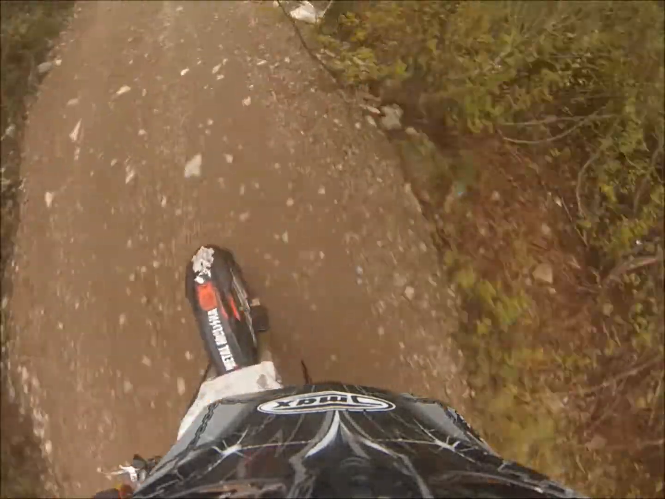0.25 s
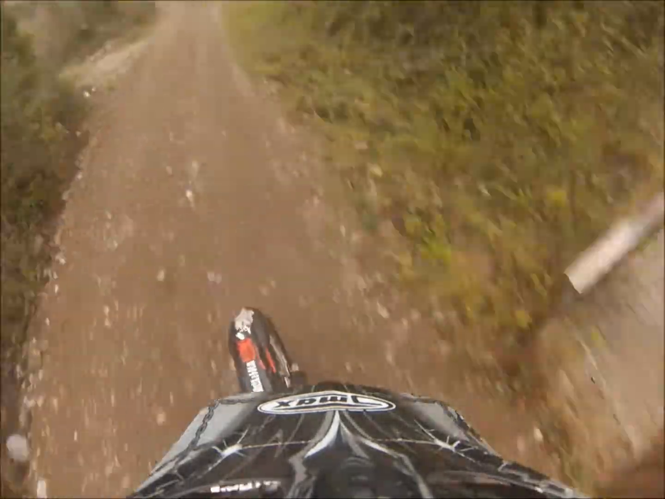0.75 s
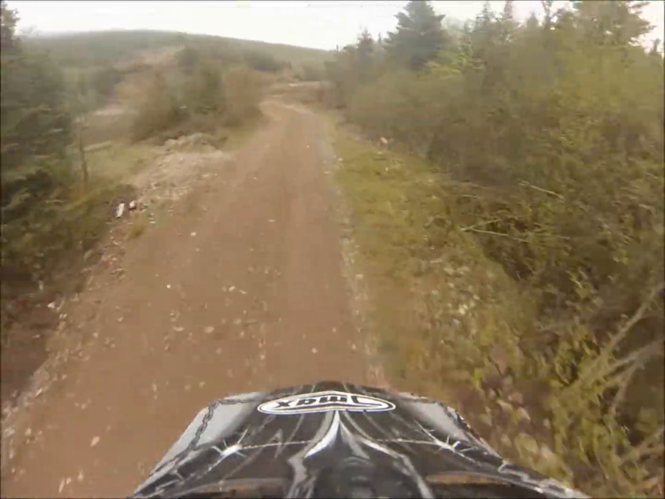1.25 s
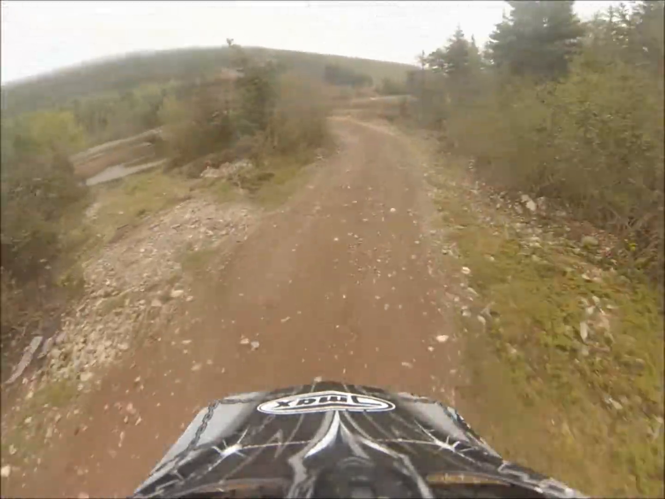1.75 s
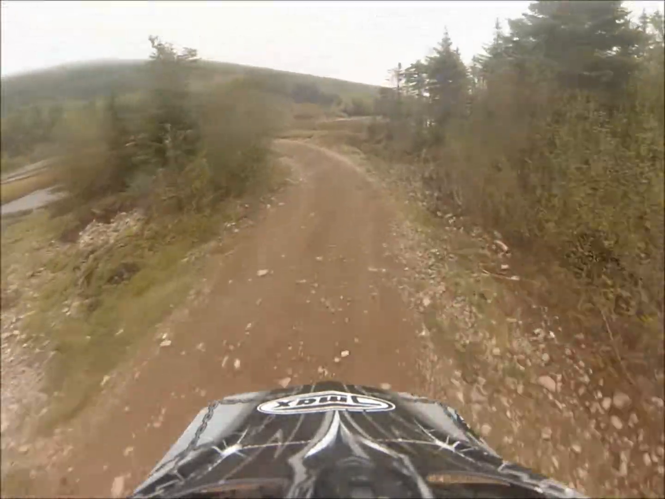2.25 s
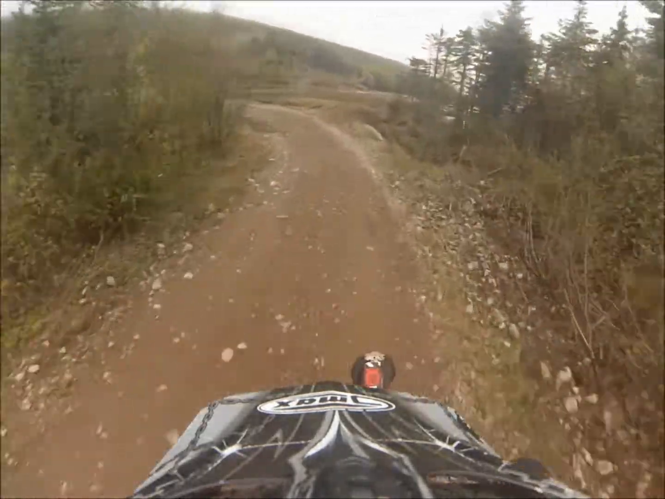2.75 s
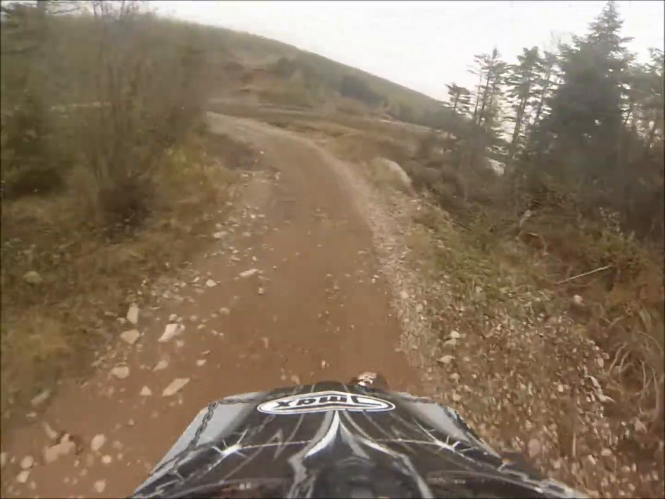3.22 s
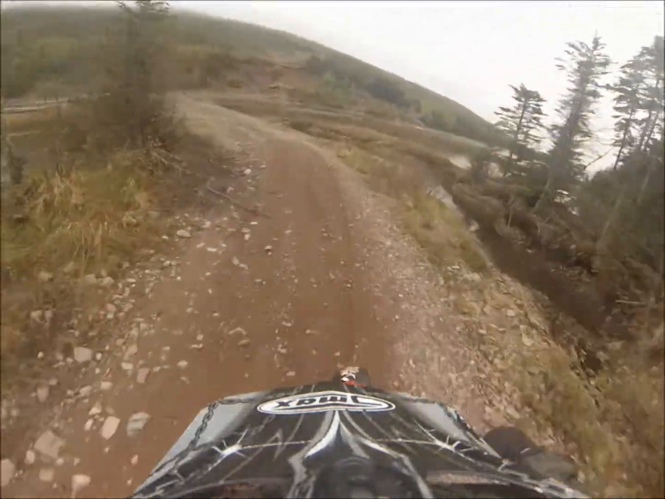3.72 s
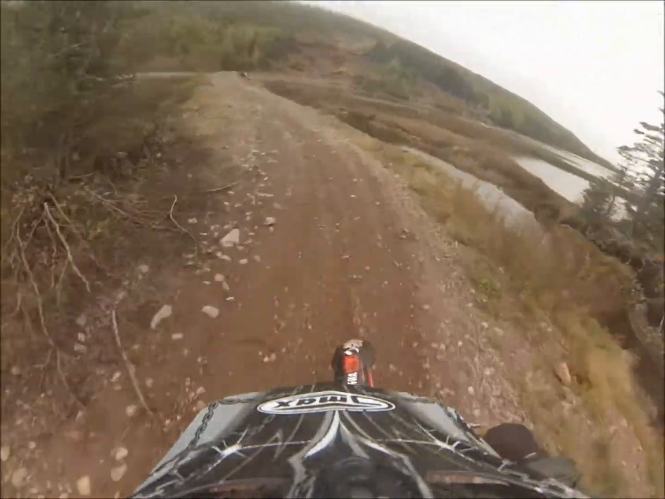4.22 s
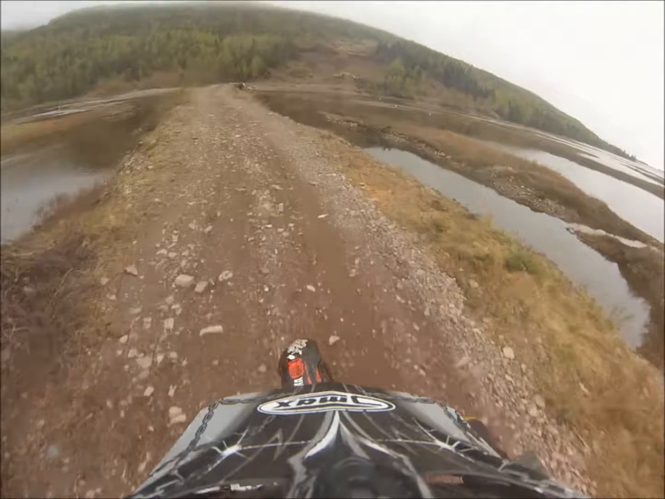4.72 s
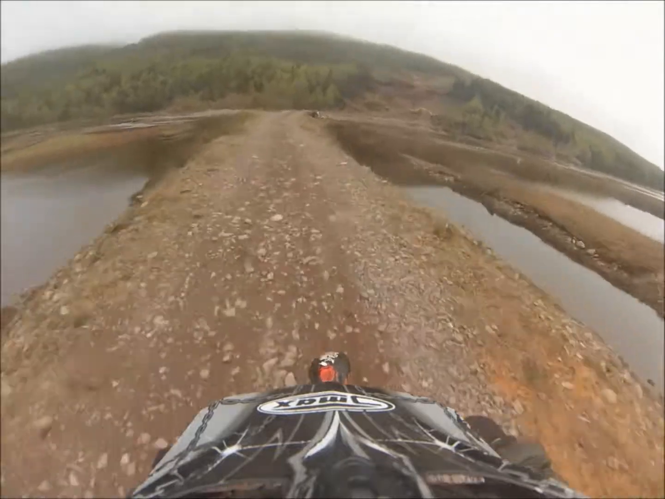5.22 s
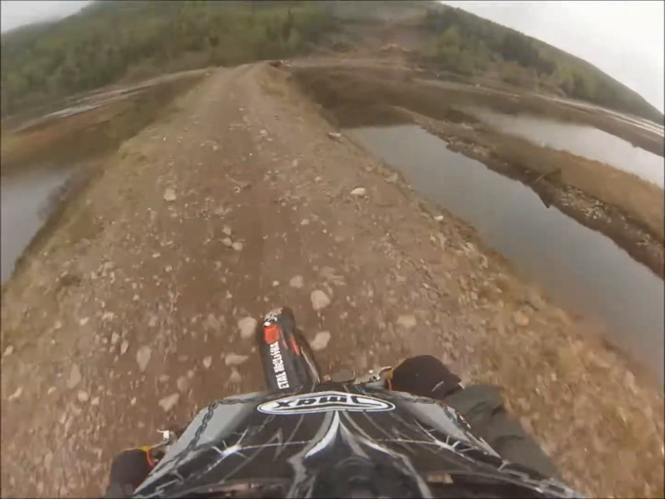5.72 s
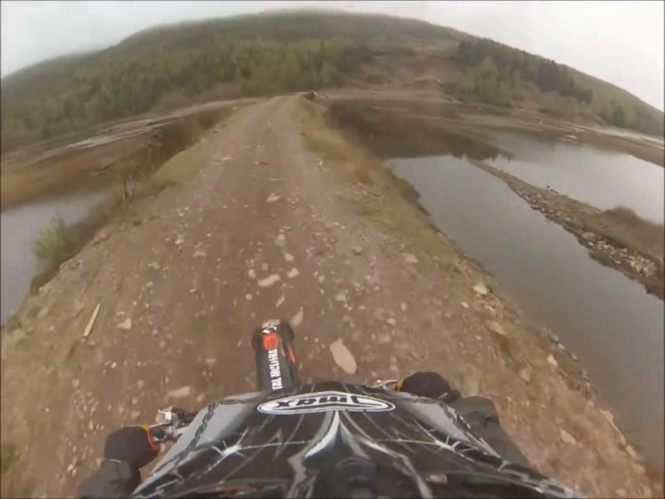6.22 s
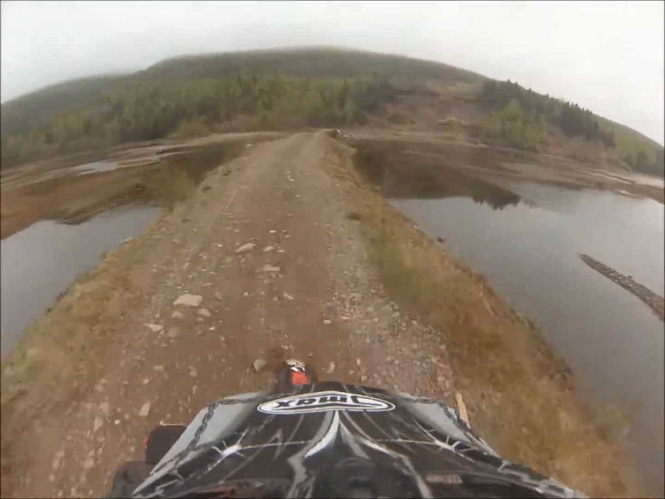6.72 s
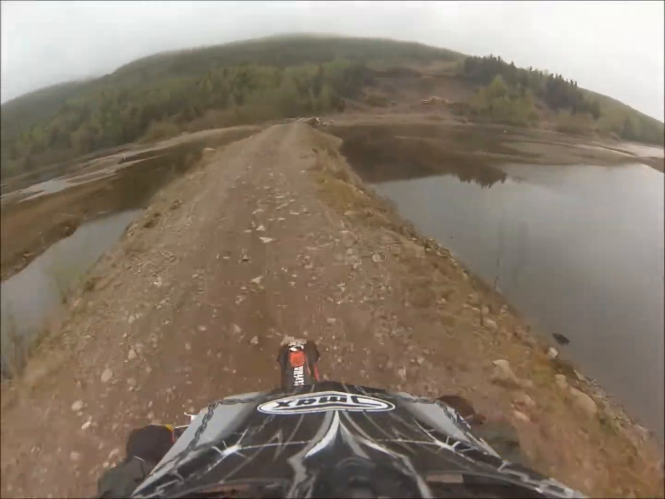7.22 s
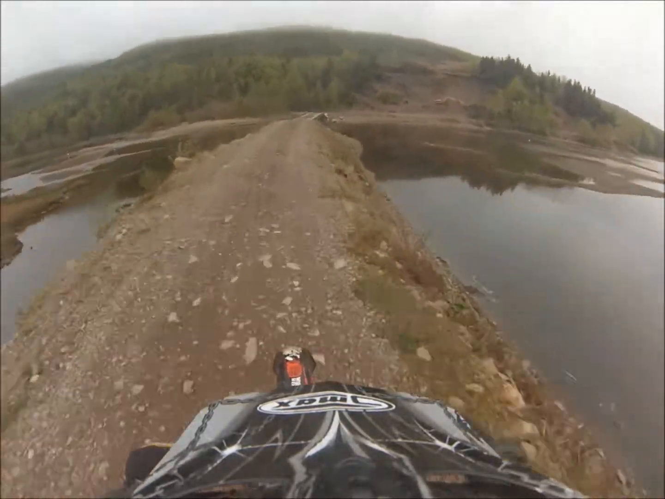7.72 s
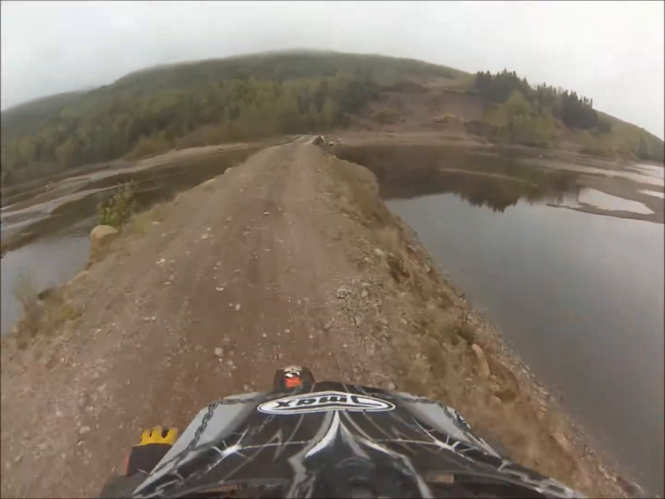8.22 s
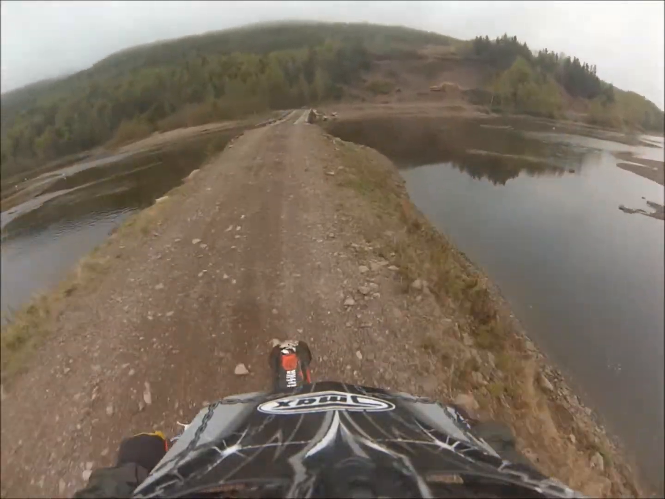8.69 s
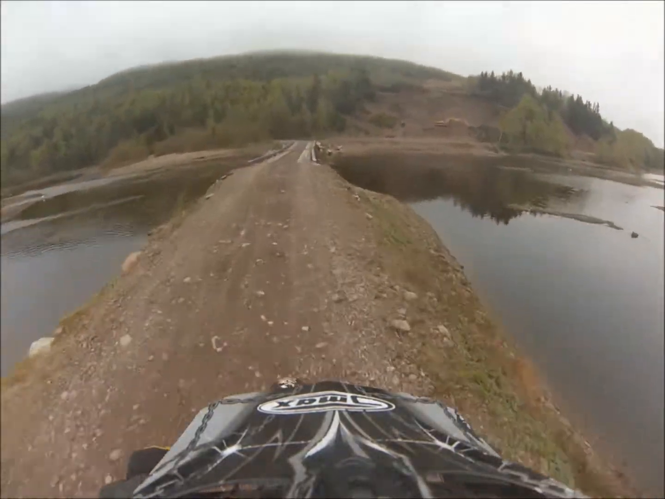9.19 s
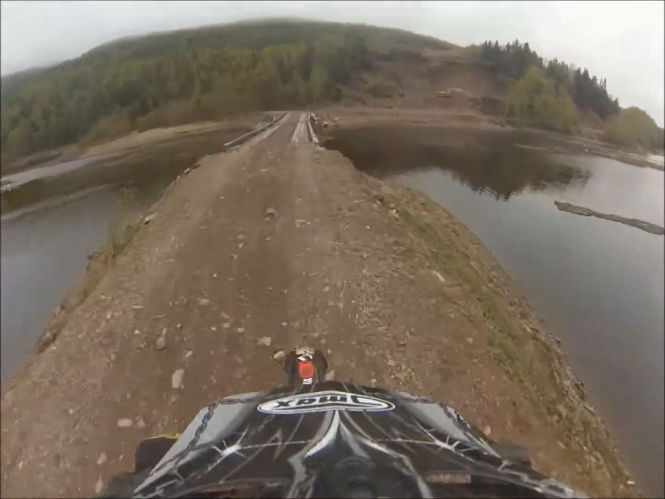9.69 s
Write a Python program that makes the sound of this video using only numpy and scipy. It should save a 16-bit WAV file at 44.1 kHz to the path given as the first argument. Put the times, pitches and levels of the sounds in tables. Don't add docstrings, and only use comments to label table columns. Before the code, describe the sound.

Outdoor gravel track, close enclosed microphone on a moving helmet. A four-stroke motorcycle engine burbles quietly and gradually slows, then revs up sharply once and falls back. Two big thumps follow, dipping the level for an instant. Steady puttering returns with thin gear whine, gusty low boom, dull knocks, scuffs and tiny ticks; near the end the revs hop up twice as the bike slows further.

```python
import sys
import numpy as np
from scipy import signal
from scipy.fft import rfft, irfft, next_fast_len
from scipy.io import wavfile
from scipy.ndimage import uniform_filter1d, map_coordinates

SR = 44100
rng = np.random.default_rng(int(sys.argv[2]) if len(sys.argv) > 2 else 0)


def linear_from_db(decibels):
    return 10 ** (np.asarray(decibels, float) / 20)


def store_pcm(level_fs):
    pcm = np.round(np.clip(level_fs, -1, 1) * 32767).astype(np.int16)
    wavfile.write(sys.argv[1], SR, np.atleast_2d(pcm).T)


N = 438794

# time in seconds, loudness in dB, air and tyre rush over it in dB.
ENGINE_LEVEL = [(0, -46, -0.5), (.4, -45, 2), (1.3, -44.5, 0), (1.6, -45, 4.5), (2.35, -47.5, 1),
                (3.5, -47.5, 0.5), (4.24, -46.5, -3), (4.46, -41.5, 3.5), (4.62, -32, -1),
                (4.87, -31, -1.5), (5.13, -42, 2), (5.5, -41.5, 2), (6.6, -45.5, 0.5), (7, -43.5, 3.5),
                (8.15, -44, 3.5), (8.55, -46, 1.5), (9.25, -46, 1), (9.95, -53.5, -1.5)]
# start in seconds, extra firings in 1/s.
DOWNSHIFTS = [
    (8.54, 14),
    (8.95, 13.5),
]
CLUTCH_S = 0.14
# frequency in Hz, width in Hz, level in dB.
CASE_MODES = [(1075, 206, -8), (1287, 250, -6), (1553, 143, -2.5), (2046, 146, -9), (2510, 150, -11.5)]
# frequency in Hz, width in Hz, level in dB.
SHELL_MODES = [(3625, 970, 6), (5300, 1970, 0), (6610, 960, -2), (12000, 1100, -24.5)]


def engine():
    # time in seconds, firings in 1/s.
    crank_speed = [(0, 32), (.3, 32.7), (.55, 31.2), (1.5, 31.7), (1.75, 30.2), (2.6, 29.2), (3.4, 26),
                   (4.18, 26.1), (4.52, 29.8), (4.65, 38.1), (4.76, 43.7), (4.88, 46.4), (5.13, 39.2),
                   (5.3, 35), (7.3, 34), (8.06, 32.9), (8.53, 28), (9.95, 24)]
    # time in seconds, load 0-1, clean share of the exhaust 0-1, firing bark in the clatter 0-1.
    throttle = [(0, .2, .35, .12), (.5, .15, .82, .08), (1.5, .13, .82, .08), (1.65, 0, .3, .06),
                (2.4, .1, .65, .08), (3.3, 0, .35, .08), (3.8, .17, .8, .12), (4.42, .2, .92, .22),
                (4.58, 1, .94, .62), (4.93, 1, .9, .42), (5.11, .25, .25, .15), (5.7, .08, .78, .1),
                (7.3, .07, .78, .08), (7.8, .1, .6, .1), (8.53, 0, .3, .12), (8.63, .1, .9, .1),
                (9.3, .1, .85, .1), (9.45, 0, .2, .12)]
    firing_at = 4.764
    slip = 0.012
    shifts = downshift_curves()
    rate = curves(crank_speed)[0] + sum(extra * shift for (_, extra), shift in zip(DOWNSHIFTS, shifts))
    load, clean, bark = curves(throttle)
    loud_db, rush_db = curves(ENGINE_LEVEL)
    clatter_db = loud_db + 3 * sum(shift ** 2 for shift in shifts)

    settled = sum(shift * np.clip(1 - CLUTCH_S * SR * np.gradient(shift), 0, 1) for shift in shifts)
    braking = linear_from_db(4) * np.sqrt(settled)

    cycle = np.cumsum(rate * (1 + 0.003 * wobble(14) + slip * (1 - load) * wobble(4))) / SR
    cycle += 400 - cycle[round(firing_at * SR)]
    burn = np.maximum.accumulate(cycle + 0.006 * (1 - 0.85 * load) * wobble(25))
    firing = burn.astype(int)
    since = (burn - firing) / rate
    size = linear_from_db(rng.standard_normal(1000)[firing] * (1.4 - 0.4 * load))
    low = sum(2 * rate / SR * np.cos(2 * np.pi * order * burn) for order in range(4, 7))
    beats = steady((np.diff(firing, prepend=firing[0]) - low) * size, 0.079)

    on_pipe = load * np.clip((rate - 35.9) / (40 - 35.9), 0, 1)
    blown = exhaust(beats, since, load, clean, on_pipe, clatter_db)
    tones = firing_orders(cycle, rate, load, clean, on_pipe, braking, sum(shifts), clatter_db)
    return blown + tones + clatter(beats, since, size, load, bark, clatter_db, loud_db + rush_db)


def exhaust(beats, since, load, clean, on_pipe, clatter_db):
    # time in seconds, resonances over their mean pitch, flow in dB.
    heat = [(0, 1.02, -4), (.6, 0.998, -2), (1.5, 0.956, -3), (2.6, 0.994, -3.5), (3.7, 0.95, -4.5),
            (3.9, .93, -1), (4.25, 0.93, 0.5), (4.5, 0.97, 2.5), (4.7, 1.1, 1), (5.2, 1.02, -2.5),
            (5.7, 1.098, -2), (7.3, 1.09, -2.5), (8.2, 1.086, -3), (8.55, .97, -4), (8.7, 1.1, -5),
            (8.95, 0.76, -3), (9.1, 1.08, -6.5), (9.4, 0.908, -6)]
    # frequency in Hz, width in Hz, level in dB.
    cruise_modes = [(173, 117, -1.5), (267, 32, 3.5), (330, 57, 2), (541, 91, -0.5), (660, 78, -1.5),
                    (844, 310, -9.5)]
    # frequency in Hz, width in Hz, level in dB.
    load_modes = [(199, 49, -14.5), (249, 14, -1), (290, 26, 1), (587, 100, -5)]

    def silencer(f):
        echo = 1 + 0.27 * np.exp(-2j * np.pi * f / 160)
        return echo * np.exp(-1j * np.pi * 0.0025 * f * f / 500)

    tuning, flow_db = curves(heat)
    coast_db = -5 * np.clip(1 - load / 0.15, 0, 1)
    level_db = clatter_db + 5 + 0.5 * clean - 7 * load + flow_db + coast_db
    gas = steady((2.1 + np.exp(-since / 0.094)) * rng.standard_normal(N), 0.8)
    source = np.sqrt(clean) * filtered(beats, silencer) + np.sqrt(1 - clean) * gas
    cruise = retuned(source, tuning, lambda x: resonate(x, cruise_modes, 70, 690, order=2))
    pulling = resonate(source, load_modes, 84, 850)
    pipe = (1 - on_pipe) * unit(cruise) + on_pipe * unit(pulling)
    return linear_from_db(level_db + 0.5) * steady(pipe, 0.25)


def firing_orders(cycle, rate, load, clean, on_pipe, braking, shift, clatter_db):
    # cruising level in dB, pulling level in dB.
    order_levels = [(-6, 9), (-2, 2), (-6.5, 2.5)]
    # order, level over the loudness in dB.
    surge_orders = [(7, -4), (8, -3), (9, -4), (16, -14), (17, -14), (18, -13)]
    # order, level over the fourth in dB.
    brake_orders = [(6, -9), (7, -9), (8, -8), (12, -9), (16, -20)]

    def lift(hz, centre_hz, width_hz):
        return 1 / (1 + ((hz - centre_hz) / width_hz) ** 2) ** 2

    def header(hz, cruise_db, pull_db):
        cruising = (1 - load) * linear_from_db(cruise_db) * (0.33 + lift(hz, 168, 190))
        return cruising + load * linear_from_db(pull_db) * (0.087 + lift(hz, 239, 44))

    burning = (0.12 + 1.33 * clean ** 2) * np.clip(1 - 0.84 * shift, 0.05, 1)
    drift_db = 3 * np.clip(1 - load - 2 * shift, 0, 1)
    out = np.zeros(N)
    for order, levels_db in enumerate(order_levels, 4):
        gain = header(order * rate, *levels_db) * burning + (order == 4) * braking
        gain = gain * linear_from_db(clatter_db + drift_db * wobble(3.4))
        phase = 4 - order + np.pi / 2 * (order == 5)
        out += np.sqrt(2) * gain * np.sin(2 * np.pi * order * cycle + phase)
    surge = load ** 2 * (1 - on_pipe)
    for gain, table in [(surge, surge_orders), (braking, brake_orders)]:
        tones = sum(linear_from_db(db) * np.sin(2 * np.pi * order * cycle - order) for order, db in table)
        out += np.sqrt(2) * gain * linear_from_db(clatter_db) * tones
    return out


def clatter(beats, since, size, load, bark, clatter_db, rush_db):
    # frequency in Hz, width in Hz, level in dB.
    intake_modes = [(1050, 100, -1.5), (1286, 120, -6)]
    snap = steady(size * (1 - np.exp(-since / 0.0012)) * np.exp(-since / 0.0055), 0.2)
    rattle = linear_from_db(0.76 * wobble(14) + wobble(60))
    gate = np.sqrt(1 - bark) * rattle + np.sqrt(bark) * snap
    body = resonate(gate * rng.standard_normal(N) + 0.65 * load * beats, CASE_MODES, 700, 3500)
    body += load * resonate(0.41 * gate * rng.standard_normal(N) + beats, intake_modes, 470, 1300)
    hiss = resonate((gate + 0.5) * linear_from_db(0.95 * wobble(18)) * rng.standard_normal(N), SHELL_MODES, 2140, 11300)
    hiss += load * resonate((gate + 0.5) * rng.standard_normal(N), [(7440, 1900, -3.5)], 5000, 12000)
    return linear_from_db(clatter_db) * steady(body, 0.21) + linear_from_db(rush_db - 15.5) * steady(hiss, 0.21)


def downshift_curves():
    settle_s = 0.22
    t = np.arange(N) / SR
    out = []
    for start, _ in DOWNSHIFTS:
        climb = np.clip((t - start) / CLUTCH_S, 0, 1)
        after = np.maximum(t - start - CLUTCH_S, 0)
        out.append(climb * np.exp(-(after / settle_s) ** 2))
    return out


def gears():
    # frequency in Hz, width in Hz, level in dB.
    whine_modes = [(1575, 40, 0), (1988, 36, 0), (7550, 250, 0), (2560, 60, 0)]
    # start in seconds, end in seconds, low mode in dB, middle mode in dB.
    pulls = [
        (0.208, 0.832, -72, -49.5),
        (0.504, 1.468, -49, -62),
        (5.39, 6.114, -68, -49),
        (5.9, 7.41, -51, -51),
        (8.55, 8.95, -50, -50),
        (4.45, 5.12, -47, -42.5),
    ]
    # time in seconds, pitch over its mean.
    mesh_glide = [(0, 1.015), (.3, 1.01), (.5, .955), (.8, .99), (1.4, 1.01), (1.7, .98), (5, 1.0),
                  (9.95, 1.0)]
    # time in seconds, swell in dB.
    chain_swell = [(0, 2.5), (1, -3), (1.5, -0.5), (2.2, -1), (2.7, -3), (4.2, 1), (5, 0.5), (6.6, -4.5),
                   (7, -1), (8.3, -0.5), (8.7, -5), (9.95, -1)]
    fade_s = 0.18
    t = np.arange(N) / SR
    loud_db, rush_db = curves(ENGINE_LEVEL)
    low, middle, high = [linear_from_db(np.minimum(loud_db, -43) + db) for db in [-63, -11.5, -27]]
    for start, end, low_db, middle_db in pulls:
        pulling = np.clip(np.minimum(t - start, end - t) / fade_s, 0, 1)
        low = low + linear_from_db(low_db) * pulling
        middle = np.maximum(middle, linear_from_db(middle_db) * pulling)
    high = high * linear_from_db(0.7 * rush_db + curves(chain_swell)[0])
    lines = [unit(resonate(rng.standard_normal(N), [mode], 1000, 7400)) for mode in whine_modes]
    glide = curves(mesh_glide)[0]
    lines[0] = np.interp(np.cumsum(glide / glide.mean()), np.arange(N), lines[0])
    return sum(gain * line for gain, line in zip([low, middle, high, linear_from_db(-16) * low], lines))


def wind():
    # time in seconds, strength in dB, slow side pressure over it in dB.
    wind_level = [(0, -31.5, 10.5), (1, -30, 1), (2, -33, -3.5), (2.6, -34.5, 7), (3.2, -29.5, 9),
                  (3.9, -34.5, 6.5), (4.5, -38, 1), (5.1, -25.5, 10.5), (5.7, -34.5, 9.5), (6.3, -25.5, 4),
                  (7, -28.5, 4.5), (8, -27, 6), (8.8, -33, 5.5), (9.3, -32.5, 12), (9.6, -40, 9.5),
                  (9.95, -34, 12.5)]
    # time in seconds, level over the wind in dB, half length in seconds.
    gusts = [(0.146, 11, 0.06), (0.378, 8.5, 0.024), (0.856, 0, 0.079), (1.322, -4, 0.05),
             (1.758, 7.5, 0.034), (2.497, -5, 0.075), (2.769, 15, 0.014), (2.98, 1.5, 0.21),
             (3.294, -10, 0.017), (3.644, 7, 0.065), (4.04, 4.5, 0.047), (4.392, 3, 0.06),
             (4.776, -4.5, 0.062), (5.204, 17.5, 0.017), (5.331, 12.5, 0.031), (5.572, 5.5, 0.045),
             (6.002, 7.5, 0.033), (6.633, 6, 0.12), (7.44, 8.5, 0.026), (7.596, 16, 0.015),
             (7.973, -4, 0.047), (8.166, 10.5, 0.038), (8.609, 15.5, 0.021), (9.04, 15.5, 0.023),
             (9.316, 12.5, 0.032), (9.778, 8.5, 0.01)]
    # frequency in Hz, width in Hz, level in dB.
    boom_modes = [(24.7, 8.6, -6), (67, 27.3, 1.5), (85.4, 19.9, 6.5), (108, 900, -19)]
    # start in seconds, peak in dB, frequency in Hz.
    jolt_events = [(.1, -21, 80), (.797, -19, 76), (.894, -20, 86), (1.082, -23, 83), (2.768, -19, 80),
                   (3.186, -22, 67), (3.647, -20, 70), (5.947, -22, 65), (6.279, -22, 78), (6.532, -19, 78),
                   (6.985, -21, 86), (7.371, -19, 83), (7.726, -20, 70), (8.133, -20, 70), (9.021, -21, 67),
                   (9.296, -18, 81), (5.176, -10, 78), (5.296, -10, 80), (5.5, -18, 83), (6.4, -16, 70),
                   (6.654, -15, 65), (6.737, -17, 62), (7.094, -17, 78), (7.59, -17, 60), (8.054, -17, 65),
                   (8.58, -19, 78)]
    strength_db, side_db = curves(wind_level)
    now = np.arange(N) / SR
    boom_db = strength_db + sum(db * np.exp(-0.5 * ((now - s) / half) ** 2) for s, db, half in gusts)
    deep_db = boom_db + side_db - 12 + 3.7 * wobble(7.1)
    lumps = linear_from_db(1.8 * wobble(3.0) + 0.97 * wobble(13))
    boom = steady(resonate(lumps * rng.standard_normal(N), boom_modes[1:], 68, 184), 0.25)
    deep = steady(resonate(lumps * rng.standard_normal(N), boom_modes[:1], 22, 48), 0.1)

    t = np.arange(SR // 8) / SR
    swell = (t / 0.01 * np.exp(1 - t / 0.01)) ** 1.1
    jolts = place((s, -linear_from_db(db) * swell * np.sin(2 * np.pi * hz * t)) for s, db, hz in jolt_events)
    pressed = np.clip(place((s - 0.01, 1.4 * np.exp(-t / 0.04)) for s, _, _ in jolt_events), 0, 0.85)
    free = 1 - uniform_filter1d(pressed, size=SR // 100)
    return free * (linear_from_db(boom_db) * boom + linear_from_db(deep_db) * deep) + jolts


def helmet():
    # start in seconds, peak in dB, frequency in Hz.
    thuds = [(0.141, -34, 310), (0.245, -26.5, 297), (0.421, -31, 325), (1.109, -34, 322),
             (1.734, -32.5, 350), (1.951, -32.5, 310), (2.232, -36.5, 340), (2.369, -31.5, 328),
             (2.468, -33, 356), (2.568, -32, 328), (2.677, -34, 330), (2.891, -33, 350), (3.31, -36, 356),
             (3.375, -33, 340), (3.523, -36, 308), (3.639, -32, 280), (3.778, -34.5, 356),
             (3.974, -32, 319), (4.132, -32, 297), (5.039, -27, 360), (5.157, -36, 352), (5.274, -34, 342),
             (5.46, -30, 305), (5.497, -31, 320), (5.602, -33, 328), (5.661, -28.5, 330), (6.108, -32, 356),
             (6.505, -34.5, 320), (7.06, -34, 346), (7.32, -32, 338), (7.509, -38, 446),
             (7.895, -28.5, 367), (8.013, -30, 308), (8.106, -36, 346), (8.191, -32, 325),
             (8.621, -30.5, 296), (8.61, -39, 454), (9.004, -36, 350), (9.07, -37, 553), (9.397, -33, 339),
             (9.767, -41, 317), (9.549, -41, 314), (9.921, -39, 310)]
    t = np.arange(SR // 12) / SR
    events = []
    for s, db, hz in thuds:
        envelope = linear_from_db(db + 5 - 60 * t / 0.06) * (1 - np.exp(-t / 0.002))
        tone = np.sin(2 * np.pi * hz * t) + 0.15 * np.sin(2 * np.pi * 1.42 * hz * t)
        events.append((s, envelope * tone))
    return place(events)


def mount():
    # start in seconds, peak in dB, length in seconds.
    scuffs = [(0.163, -51, 0.057), (0.33, -47.5, 0.036), (0.242, -53, 0.023), (0.404, -48.5, 0.049),
              (0.508, -52, 0.029), (0.685, -52, 0.022), (1.397, -53, 0.093), (1.463, -52, 0.045),
              (1.664, -53.5, 0.079), (2.753, -49, 0.042), (2.899, -51, 0.04), (3.146, -50.5, 0.06),
              (3.443, -54, 0.028), (3.759, -46, 0.014), (3.901, -55, 0.059), (4.128, -55.5, 0.059),
              (5.486, -45, 0.0069), (5.511, -44, 0.019), (5.667, -44, 0.03), (5.993, -60, 0.012),
              (8.396, -52, 0.022), (8.84, -52, 0.019), (9.391, -52.5, 0.03), (9.547, -53, 0.033),
              (9.685, -53, 0.019), (6.598, -50, .02), (6.735, -58, .025), (7.15, -50, .03),
              (7.543, -49, .055), (7.88, -52, 0.022), (8.5, -60, .03), (8.856, -52, .025),
              (9.271, -51, 0.028), (9.855, -60, 0.032), (4.296, -52, .06)]
    # start in seconds, peak in dB.
    knock_events = [(1.1965, -32), (1.733, -30), (1.8452, -28.5), (2.0677, -34), (2.33, -34), (2.4678, -31),
                    (2.756, -34), (2.888, -27), (3.0784, -36), (3.116, -29.5), (3.151, -32),
                    (3.3653, -32.5), (3.763, -25), (5.1512, -22), (5.453, -21.5), (5.68, -28.5),
                    (6.298, -32), (6.5913, -28), (6.7989, -27), (7.2579, -33), (7.766, -33), (7.857, -30),
                    (7.889, -31), (8.0037, -28), (8.0391, -29), (8.13, -40), (8.185, -22), (8.2477, -31.5),
                    (8.279, -36), (8.9, -28), (9.388, -29.5)]
    t = np.arange(SR // 12) / SR
    rubs, knocks = [], []
    for s, db, length in scuffs:
        stroke = np.sin(np.pi * np.clip(t / max(length, 0.005), 0, 1))
        rubs.append((s, linear_from_db(db + 8.5) * stroke * rng.standard_normal(len(t))))
    for s, db in knock_events:
        strike = np.sin(2 * np.pi * 1480 * t) + 3.5 * rng.standard_normal(len(t))
        knocks.append((s, linear_from_db(db + 7 - 60 * t / 0.026) * strike))
    rubbing = resonate(place(rubs), SHELL_MODES, 4200, 21000)
    return rubbing + resonate(place(knocks), CASE_MODES[1:], 610, 2330)


def grit():
    # start in seconds, peak in dB.
    tick_events = [(0.1511, -52), (0.019, -44), (.256, -57), (0.817, -38.5), (1.0146, -52), (1.6546, -50),
                   (1.6931, -54), (3.0465, -58), (5.188, -37.5), (5.3048, -43), (5.484, -52), (5.516, -55),
                   (5.5558, -43), (5.6775, -53), (7.163, -60), (5.7347, -35), (6.4133, -53), (6.5415, -53),
                   (6.6064, -53), (6.7486, -47), (7.3687, -51), (7.4609, -50), (7.6031, -51), (7.8865, -53),
                   (8.0631, -52), (8.511, -42), (8.5884, -55), (9.005, -39), (9.398, -42), (9.52, -43)]
    t = np.arange(SR // 12) / SR
    ticks = []
    for s, db in tick_events:
        strike = np.sin(2 * np.pi * 10000 * t) + 2.3 * rng.standard_normal(len(t))
        ticks.append((s, linear_from_db(db - 3.5 - 60 * t / 0.011) * strike))
    return filtered(place(ticks), lambda f: (1j * f / (6000 + 1j * f)) ** 3 / (1 + (f / 12200) ** 6))


def background_hiss():
    # frequency in Hz, level in dB per Hz.
    floor_spectrum = [(60, -20), (400, -2), (900, 4), (2000, -78), (5000, -31), (9000, -27.5), (15500, -29)]
    hz, db = np.transpose(floor_spectrum)
    shape = lambda f: linear_from_db(np.interp(np.log(f + 1), np.log(hz), db))
    return linear_from_db(-60) * unit(filtered(rng.standard_normal(N), shape))


def unit(x):
    return x / np.sqrt(np.mean(x ** 2) + 1e-20)


def steady(x, seconds):
    return x / np.sqrt(np.abs(uniform_filter1d(x ** 2, int(seconds * SR))) + 1e-12)


def curves(rows):
    s, *cols = np.transpose(rows)
    return [np.interp(np.arange(N) / SR, s, c) for c in cols]


def wobble(rate):
    coarse = np.arange(0, N + 32, 32)
    knots = rng.standard_normal(int(N * rate / SR) + 4)
    return np.interp(np.arange(N), coarse, map_coordinates(knots, [coarse * rate / SR]))


def filtered(x, response):
    m = next_fast_len(N + SR // 2)
    return irfft(rfft(x, m) * response(np.fft.rfftfreq(m, 1 / SR)), m)[:N]


def resonate(x, modes, low_hz, high_hz, order=1):
    def response(f):
        peaks = 0
        for k, (centre, width, db) in enumerate(modes):
            damping = 1j * f * width
            peaks = peaks + (-1) ** k * linear_from_db(db) * damping / (centre * centre - f * f + damping)
        return peaks ** order * (1j * f / (low_hz + 1j * f)) ** 2 / (1 + 1j * f / high_hz) ** 2
    return filtered(x, response)


def retuned(x, pitch, process):
    steps = np.arange(N)
    clock = np.cumsum(pitch / np.mean(pitch))
    return np.interp(clock, steps, process(np.interp(steps, clock, x)))


def place(events):
    out = np.zeros(N + SR)
    for s, sound in events:
        out[max(round(s * SR), 0):][:len(sound)] += sound
    return out[:N]


def scene():
    return (engine() + gears() + wind() + helmet() + mount() + grit())[None]


def band_limit(x):
    return signal.sosfilt(signal.butter(12, 15690, fs=SR, output="sos"), x)


def record(dry):
    # start in seconds, depth in dB, recovery in seconds.
    ducks = [
        (5.187, -16, 0.11),
        (5.313, -6, 0.074),
    ]
    duck_db = np.zeros(N)
    for start, db, recovery in ducks:
        after = np.clip(np.arange(N) / SR - start, 0, 5)
        duck_db += db * (1 - np.exp(-after / 0.005)) * np.exp(-(after / recovery) ** 2)
    heard = filtered(linear_from_db(duck_db) * (dry[0] + background_hiss()), lambda f: f < 15350)
    return band_limit(heard[None])


dry = scene()
out = record(dry)
store_pcm(out)
```